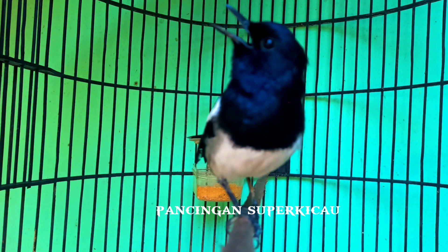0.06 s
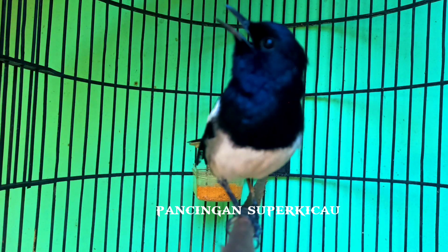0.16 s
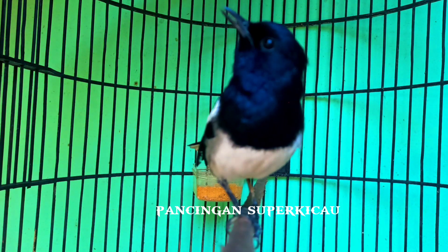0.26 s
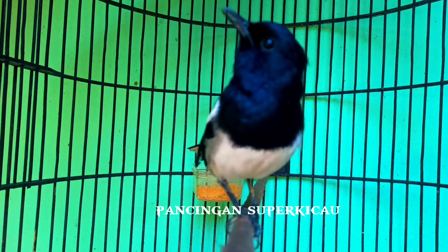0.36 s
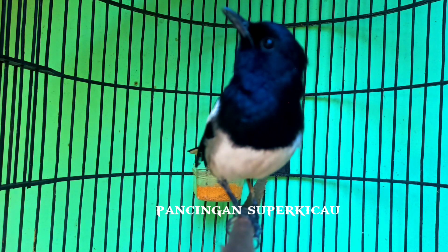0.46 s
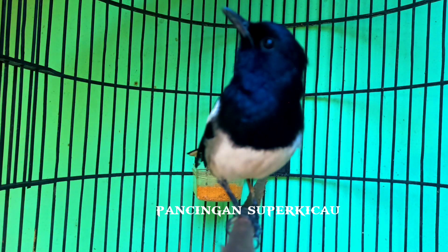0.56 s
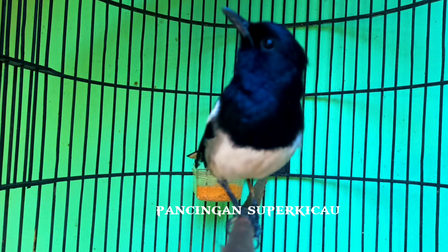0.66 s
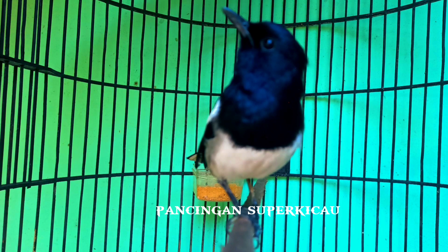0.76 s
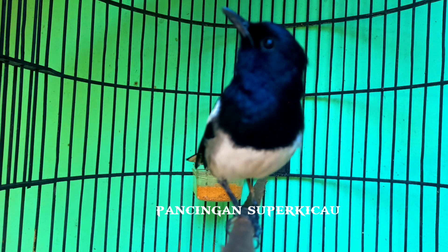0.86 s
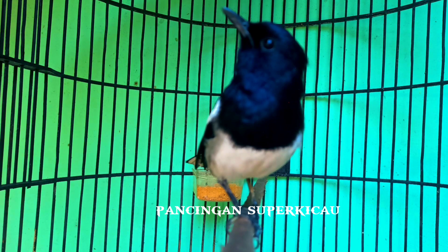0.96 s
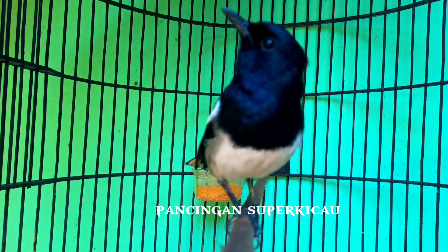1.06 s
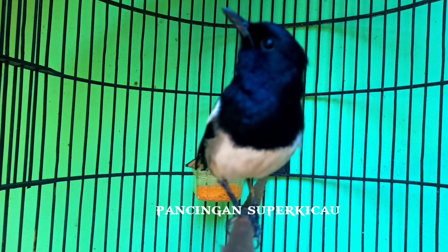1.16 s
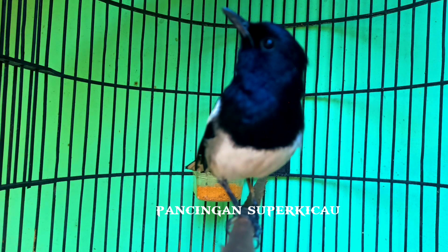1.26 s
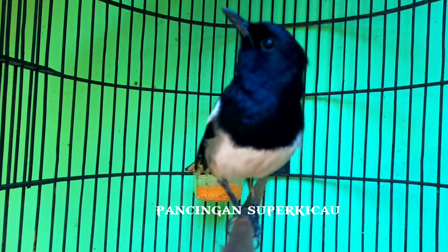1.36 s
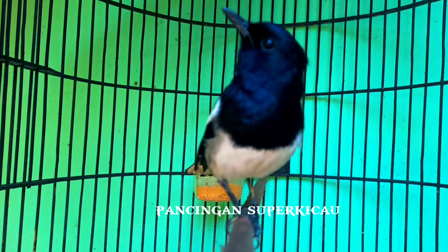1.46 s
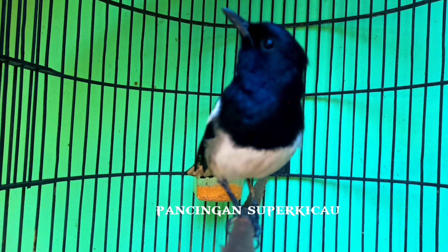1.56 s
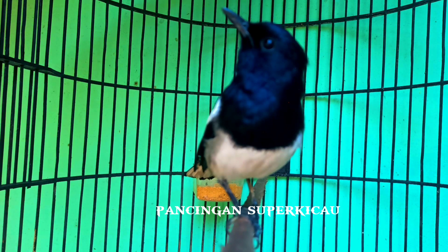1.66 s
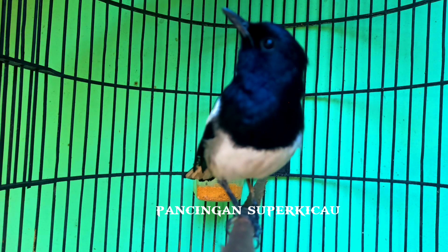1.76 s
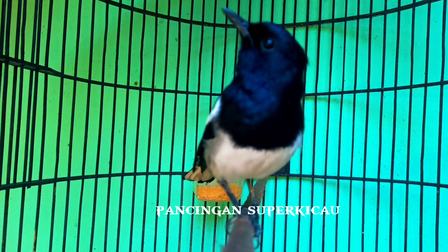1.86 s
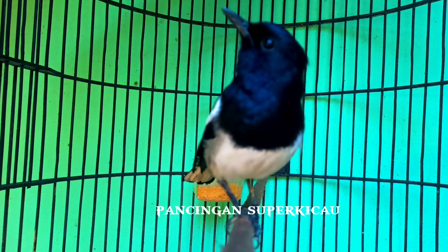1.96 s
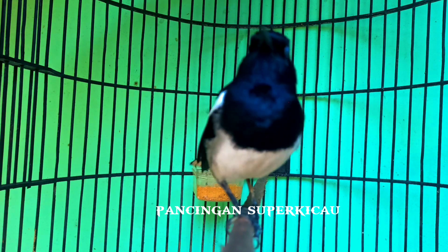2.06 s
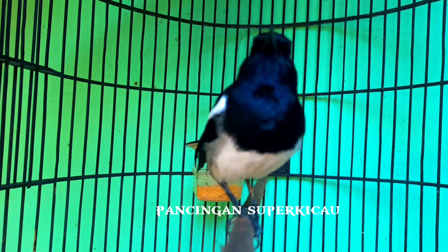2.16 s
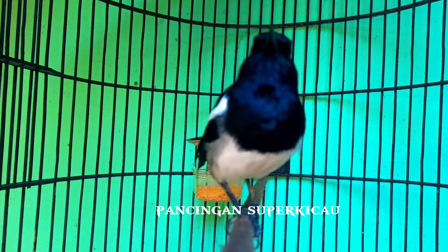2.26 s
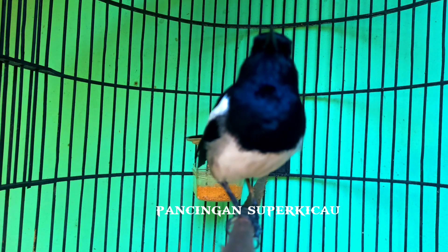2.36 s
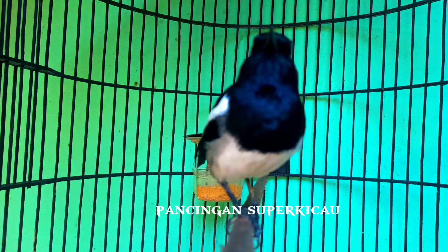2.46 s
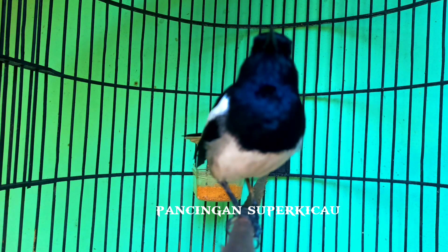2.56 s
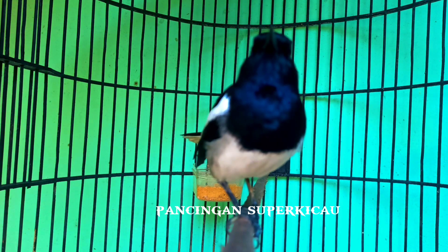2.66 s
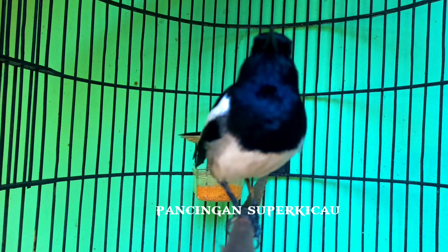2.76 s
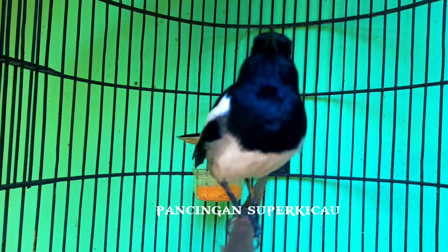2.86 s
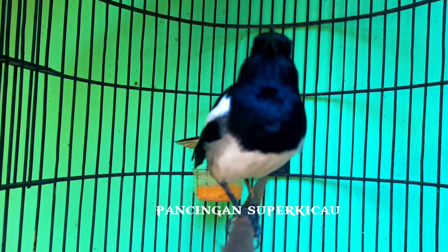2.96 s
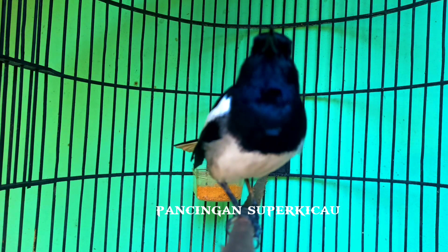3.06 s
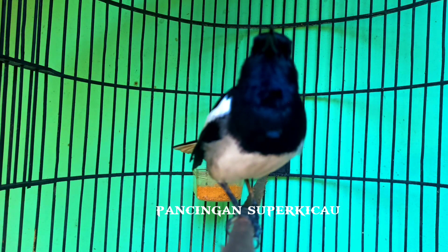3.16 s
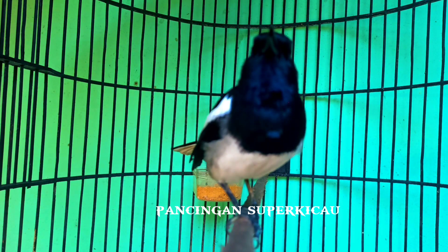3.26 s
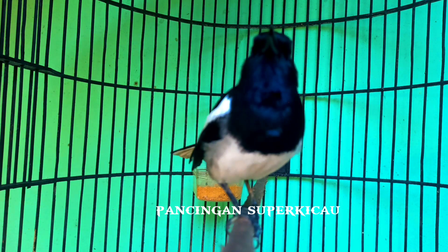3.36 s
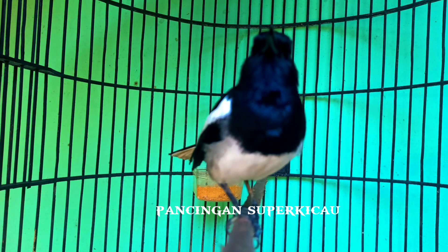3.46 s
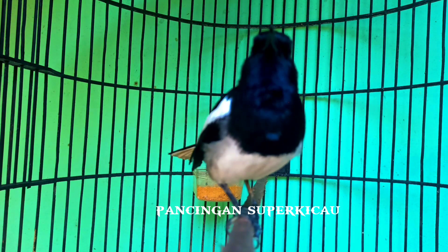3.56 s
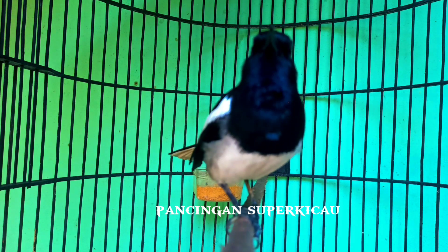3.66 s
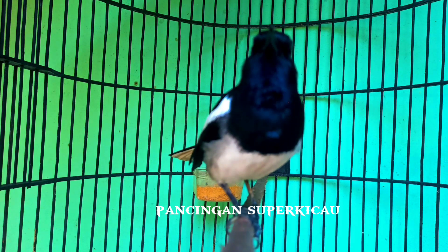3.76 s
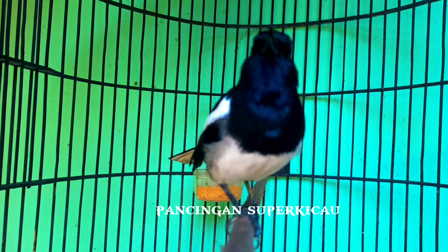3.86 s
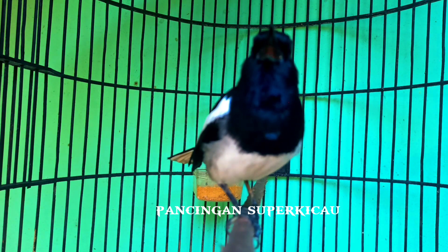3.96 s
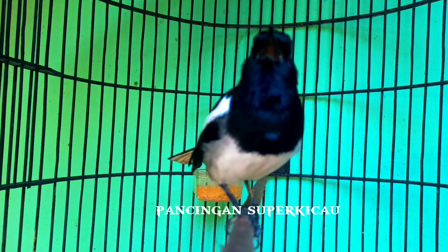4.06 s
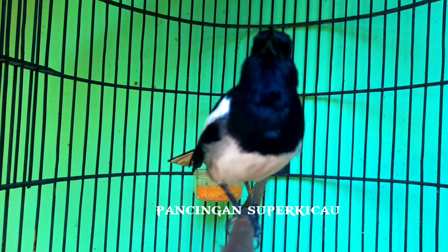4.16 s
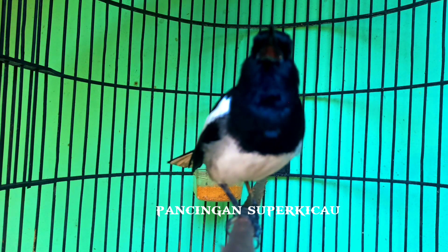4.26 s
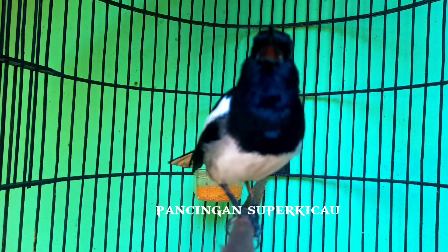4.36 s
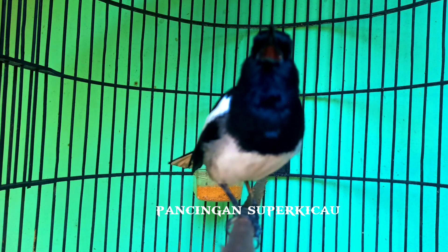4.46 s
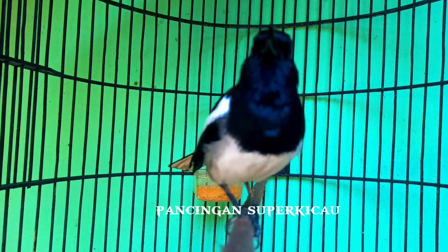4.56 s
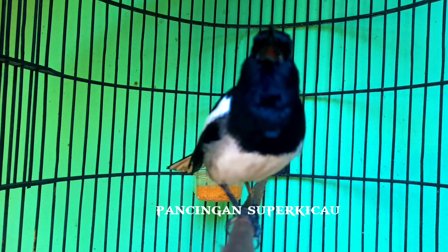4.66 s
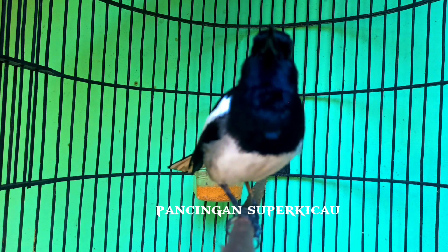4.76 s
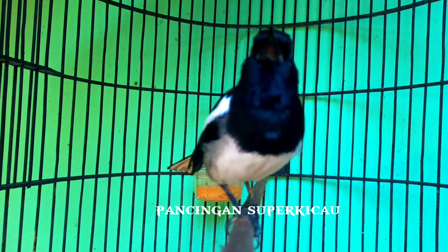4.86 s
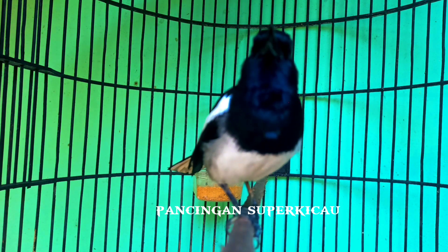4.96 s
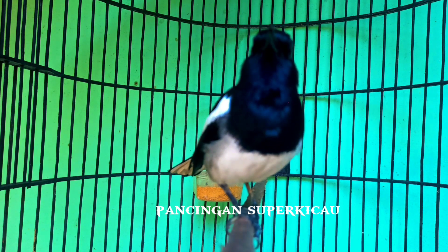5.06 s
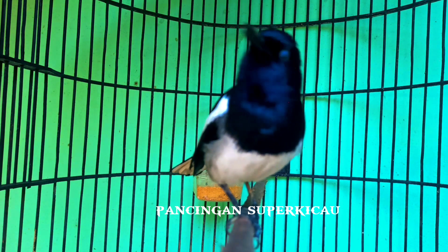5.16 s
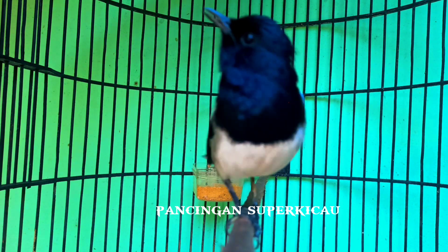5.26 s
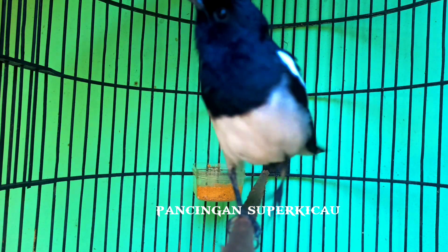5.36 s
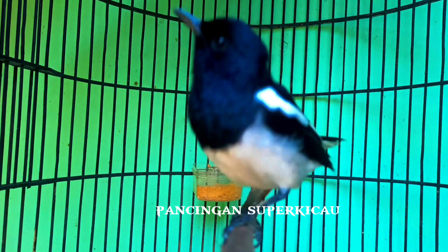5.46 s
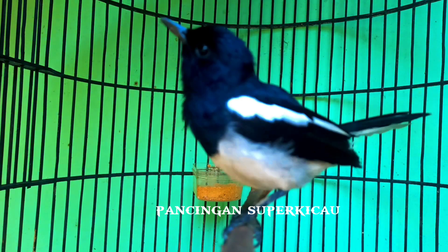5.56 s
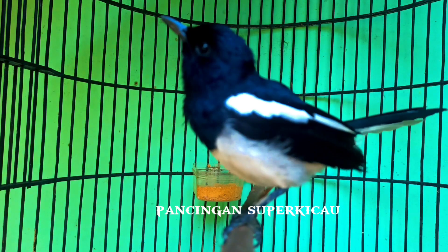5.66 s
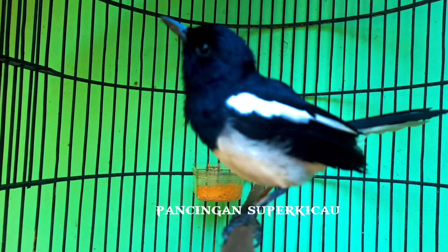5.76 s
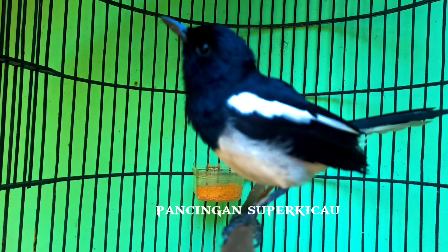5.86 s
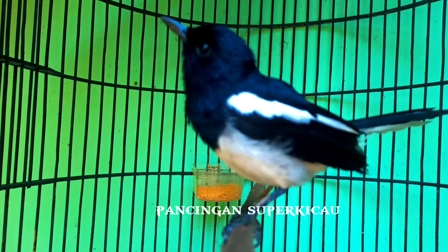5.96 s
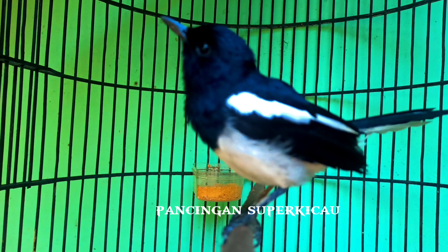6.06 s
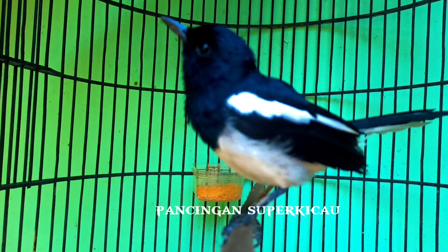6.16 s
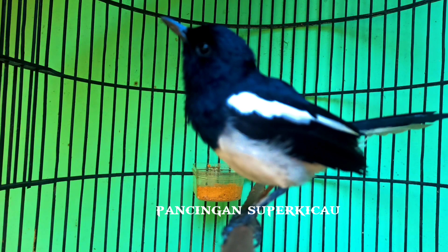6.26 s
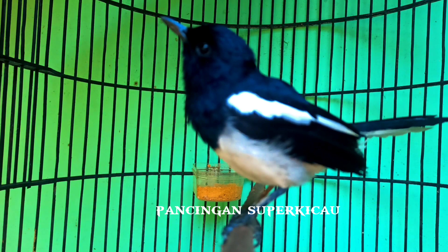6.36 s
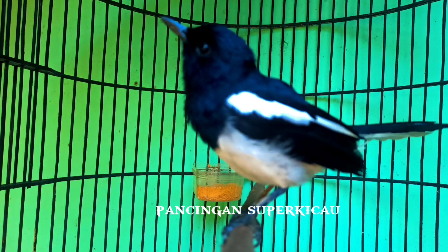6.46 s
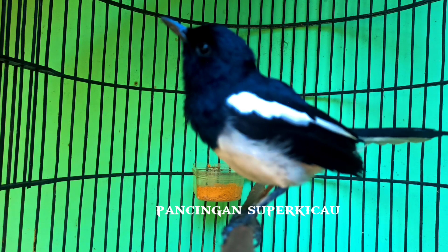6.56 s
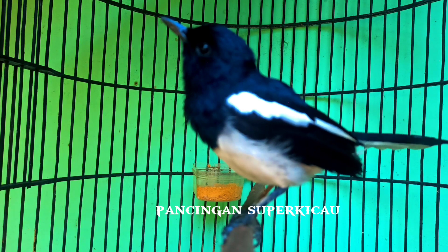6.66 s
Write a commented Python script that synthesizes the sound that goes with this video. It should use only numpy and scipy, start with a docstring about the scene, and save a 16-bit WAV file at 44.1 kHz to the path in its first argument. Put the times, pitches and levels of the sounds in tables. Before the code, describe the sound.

In a slightly echoing room, a nearby caged bird opens with a high whistle and quiet slurred notes, followed by two soft, drawn-out rasps. Loud whistles come next, lower at first and then higher, closing with a fast warble and a brief trill. Thin peeps from a more distant bird and a faint low hum carry on throughout.

```python
"""A caged magpie-robin sings

In a hard-walled room come soft sliding notes, two long hissing rasps, then loud whistles from
both sides of the bird's voice box (the syrinx), ending in a warble and a short trill.
Another bird peeps further off. A faint motor-like hum wavers underneath and dips
whenever a limiter, an automatic volume control, holds down the loud notes."""
import sys
import numpy as np
from scipy import signal
from scipy.fft import rfft, irfft, next_fast_len
from scipy.io import wavfile
from scipy.ndimage import uniform_filter1d

SR = 44100
rng = np.random.default_rng(int(sys.argv[2]) if len(sys.argv) > 2 else 0)


def materialize(psi):
    """Save the field psi as 16-bit PCM at rate SR to the path in sys.argv[1].

    A 1-D psi becomes a single channel; in a 2-D psi each row is a channel.
    """
    bounded = np.clip(np.atleast_2d(psi).T, -1, 1)
    quanta = np.round(bounded * 32767).astype(np.int16)
    wavfile.write(sys.argv[1], SR, quanta)


N = 295911
TIME = np.arange(N) / SR

# whistles: side of the voice box (0 low, 1 high), t/s, length/s, first f/Hz, last f/Hz,
# mid-note bend/Hz, opening scoop/Hz, closing flick/Hz, fade-in/s, level/dB, beak's overtone lift/dB
WHISTLES = [(1, -.012, .236, 4000, 4025, -55, 200, 220, .01, -17.5, 8),
            (0, 3.106, .33, 2535, 2550, 130, -400, -450, .085, -10, 1),
            (1, 3.569, .072, 2960, 2950, -35, 400, -150, .03, -13.5, 2),
            (0, 3.597, .252, 2325, 2225, -115, 190, -150, .085, -11, 1),
            (1, 3.953, .242, 3690, 3470, 28, -200, -300, .055, -5, 8),
            (1, 4.287, .282, 4025, 4050, -42, 1040, 40, .04, -6, 4),
            (0, 4.29, .018, 2450, 2420, 0, 0, 0, .008, -27, 0),
            (1, 4.685, .09, 4060, 4160, -30, 660, -100, .044, -7, 5),
            (0, 5.232, .104, 2370, 2280, 180, -300, -50, .004, -23, -7)]
# the warble's chain of pitch swings: t/s, lowest f/Hz, swing height/Hz, level/dB
WARBLE = [(4.742, 3120, 110, -43), (4.782, 3040, 320, -11), (4.866, 2790, 690, -10), (4.988, 3040, 290, -4),
          (5.017, 2880, 230, -11), (5.04, 2830, 330, -12)]
WARBLE_END_S = 5.064


def gain_of(db):
    """Turns decibels into a number to multiply by."""
    return 10 ** (np.asarray(db) / 20)


def unit_level(x):
    """Scales a signal to an average (rms) size of 1."""
    return x / np.sqrt(np.mean(x ** 2) + 1e-20)


def value_at(points, hz):
    """Reads between rows of f/Hz, value."""
    f, value = np.transpose(points)
    return np.interp(np.log(hz + 1), np.log(f), value)


def noise(colour):
    """Noise of size 1, shaped by rows of f/Hz, level/dB."""
    shape = gain_of(value_at(colour, np.fft.rfftfreq(N, 1 / SR)))
    return unit_level(irfft(rfft(rng.standard_normal(N)) * shape, N))


def wander(rate_hz):
    """A smooth random wobble of size 1, mostly slower than the given rate."""
    size = next_fast_len(N)
    slow = np.exp(-(np.fft.rfftfreq(size, 1 / SR) / rate_hz) ** 2)
    return unit_level(irfft(rfft(rng.standard_normal(size)) * slow, size)[:N])


def envelope(rows):
    """Loudness over time, with rounded ends, from rows that start with t/s and end with level/dB."""
    rows = np.array(rows)
    inside = (TIME >= rows[0, 0]) & (TIME <= rows[-1, 0])
    gain = np.zeros(N)
    gain[inside] = gain_of(np.interp(TIME[inside], rows[:, 0], rows[:, -1]))
    return uniform_filter1d(uniform_filter1d(gain, size=100), size=70)


def breath(start, length, attack, db, release_s=.024):
    """One breath fades in, holds and fades out: rows of t/s, level/dB."""
    t = np.linspace(0, length, num=120)
    rise, fall = np.clip(t / attack, 0, 1), np.clip((length - t) / release_s, 0, 1)
    gain = np.sin(np.pi / 2 * rise) ** 2 * np.sin(np.pi / 2 * fall) ** 2
    return np.column_stack([start + t, db + 20 * np.log10(gain + 1e-4)])


def background(base_hz=49.65, air_db=-53.8):
    """A wavering motor-like hum over the room's low rumble and faint hiss."""
    # the hum's tones: multiple of the base pitch, level/dB
    tones = [(2, -6), (3, -9), (4, -14.5), (5, -14), (6, -20), (7, -17.5), (8, -16), (9, -17.5)]
    # the hum's slow drift: t/s, level/dB
    drift = [(0, -56), (.8, -49.5), (1.7, -53), (2.7, -53), (3.7, -56), (4.4, -55), (5.2, -49),
             (6.7, -53.5)]
    # the colour of the room's air: f/Hz, level/dB
    air = [(15, -57.5), (25, -26), (64, -21), (84, -8.5), (110, -2), (399, -20), (1020, -32.5),
           (2630, -38.5), (3440, -35), (3930, -37.5), (5140, -35.5), (5580, -56), (6550, -26), (9050, -51),
           (15500, -45)]
    phase = 2 * np.pi * np.cumsum(base_hz * (1 + .006 * wander(2.7))) / SR
    hum = sum(gain_of(db + 1.3 * wander(3)) * np.cos(round(k) * phase + .5 * wander(5.3))
              for k, db in tones)
    return gain_of(np.interp(TIME, *np.transpose(drift))) * hum + gain_of(air_db) * noise(air)


def ticks():
    """Tiny clicks as hard notes start and as the bird shifts on its perch."""
    # clicks: t/s, level/dB
    clicks = [(.262, -51), (3.576, -40.5), (3.96, -46.5), (4.297, -43), (4.693, -45.5), (5.492, -53.5),
              (5.522, -57.5), (6.58, -62)]
    scratch = noise([(1000, -4.5), (3000, 1.5), (8000, -.5), (10000, -14.5), (14000, -13)])
    return scratch * sum(envelope([(start, db), (start + .015, db - 22)]) for start, db in clicks)


def peeps(fade_db=19):
    """The other bird's short thin notes; a fast pitch wobble makes some of them buzz."""
    # peeps: t/s, length/s, first f/Hz, last f/Hz, wobble/Hz, peak level/dB
    notes = [(0.071, 0.082, 5300, 5240, 12, -29.5), (1.361, 0.077, 5380, 5290, 100, -33.5),
             (1.973, 0.12, 6550, 6550, 310, -59), (3.244, 0.077, 5310, 5220, 17, -37.5),
             (3.485, 0.067, 5150, 5267, 19, -31.5), (3.505, 0.052, 6400, 6400, 180, -55),
             (3.695, 0.068, 5266, 5144, 17, -35.5), (3.904, 0.071, 5305, 5200, 15.5, -30.5),
             (4.105, 0.1, 5280, 5380, 21, -40), (4.325, 0.058, 5400, 5305, 30, -35),
             (4.614, 0.058, 6300, 6350, 110, -55), (5.255, 0.08, 5110, 5175, 15, -32),
             (6.188, 0.088, 5150, 5320, 15, -30.5)]
    buzz, out = wander(300), np.zeros(N)
    for start, length, first_hz, last_hz, buzz_hz, db in notes:
        hz = np.interp(TIME, [start, start + length], [first_hz, last_hz]) + buzz_hz * buzz
        swell = zip(np.linspace(start, start + length, 4), [db - fade_db, db, db - 1, db - fade_db])
        out += np.sqrt(2) * envelope(list(swell)) * np.cos(2 * np.pi * np.cumsum(hz) / SR)
    return out


def slurs(harshness=.045, fade_db=15):
    """Soft notes that slide along a curve; the faster the slide, the less steady the tone."""
    # slides: t/s, length/s, first f/Hz, middle f/Hz, last f/Hz, peak level/dB, place of the peak (0-1)
    notes = [(.005, .085, 1060, 1410, 1490, -41, .5), (.11, .055, 1545, 1565, 1570, -32, .45),
             (.255, .09, 3350, 2200, 1350, -35, .2), (.421, .055, 1630, 1595, 1570, -34, .25),
             (.505, .095, 1590, 1610, 1690, -34, .6), (.575, .115, 1660, 1870, 2060, -35, .4),
             (.6, .055, 3400, 3600, 3970, -59, .8), (.753, .04, 2330, 2260, 2180, -45, .3),
             (.79, .047, 2180, 2190, 2150, -25, .6), (.859, .052, 2226, 2160, 2125, -25.5, .33),
             (1.012, .11, 880, 1520, 1590, -38.5, .6), (1.1, .11, 1600, 1480, 1390, -38, .6),
             (1.708, .035, 2370, 2750, 2950, -58, .15), (3.32, .055, 3630, 4150, 4770, -50, .7),
             (4.195, .115, 3380, 3610, 3730, -33, .7), (4.585, .048, 4080, 4270, 4600, -35, .6),
             (5.65, .11, 3450, 4000, 5120, -53, .75), (5.745, .07, 5100, 5130, 5130, -49, .4)]
    wobble, out = wander(470), np.zeros(N)
    from_peak = np.linspace(-1, 1, num=21)
    for start, length, first_hz, middle_hz, last_hz, db, peak in notes:
        progress = np.clip((TIME - start) / length, 0, 1)
        curve_hz = (2 * middle_hz - first_hz - last_hz) * 2 * progress * (1 - progress)
        hz = first_hz + (last_hz - first_hz) * progress + curve_hz
        speed = np.minimum(np.abs(np.gradient(hz)) * SR / 20000, 1)
        phase = 2 * np.pi * np.cumsum(hz * (1 + (.0018 + harshness * speed) * wobble)) / SR
        times = start + length * np.interp(from_peak, [-1, 0, 1], [0, np.clip(peak, 0, 1), 1])
        swell = np.column_stack([times, db - fade_db * from_peak ** 2])
        out += np.sqrt(2) * envelope(swell) * np.cos(phase)
    return out


def rasp(breaths, colour, rattle_db=2.5, bounce_s=.0036, bounce_gain=.2):
    """Air forced through a tight throat: a rattling hiss, plus its quick bounce off a near wall."""
    hiss = noise(colour) * gain_of(rattle_db * wander(130))
    bounce = bounce_gain * np.roll(hiss, round(bounce_s * SR))
    return sum(envelope(breath(*row)) for row in breaths) * unit_level(hiss + bounce)


def rasps():
    """Two hissing rasps, the second slightly lower and louder."""
    # breaths: t/s, length/s, fade-in/s, level/dB
    first_rasp = [(.635, .75, .04, -49)]
    second_rasp = [(1.98, .33, .12, -68), (2.368, .745, .055, -46.8)]
    # their colours: f/Hz, level/dB
    first_colour = [(1500, -33), (2400, -21.5), (3100, -14), (3800, -6.5), (4200, -6), (4600, 4),
                    (5000, -21), (5900, -22), (6300, -12.5), (7200, -16), (7650, -7.5), (8450, -19),
                    (8800, -30.5), (10500, -56)]
    second_colour = [(1700, -41.5), (2400, -23), (3300, -20.5), (3800, -8), (4050, -14), (4320, 0.5),
                     (4720, -11), (5050, -30), (5900, -33), (6400, -23), (7300, -19), (7580, -13.5),
                     (8400, -25.5), (9000, -55)]
    return rasp(first_rasp, first_colour) + rasp(second_rasp, second_colour)


def whistle_note(start, length, first_hz, last_hz, bend_hz, scoop_hz, flick_hz, attack, db):
    """A whistle scoops into a curved slide and flicks as it stops: rows of t/s, f/Hz, level/dB."""
    scoop_s, flick_s = .032, .007
    times, level = breath(start, length, attack, db).T
    t = times - start
    slide = first_hz + (last_hz - first_hz) * t / length + bend_hz * np.sin(np.pi * t / length) ** 2
    hz = slide + scoop_hz * np.exp(-t / scoop_s) + flick_hz * np.exp((t - length) / flick_s)
    return np.column_stack([times, hz, level])


def whistle_notes(side):
    """The whistles sung by one side of the voice box."""
    return [whistle_note(*row[1:-1]) for row in WHISTLES if round(row[0]) == side]


def warble_note(end_hz=2680, end_db=-20):
    """The pitch arches from each low point to the next without a break: rows of t/s, f/Hz, level/dB."""
    starts, low_hz, height_hz, db = np.transpose(WARBLE + [(WARBLE_END_S, end_hz, 0, end_db)])
    times = np.linspace(starts[0], starts[-1], num=300)
    swing = np.interp(times, starts, np.arange(len(starts)))
    hz = np.interp(times, starts, low_hz) + height_hz[swing.astype(int)] * np.sin(np.pi * (swing % 1))
    return np.column_stack([times, hz, np.interp(times, starts, db)])


def syrinx(notes, bend_hz=0, pitch_wobble=.0036, shimmer_db=.9):
    """One vibrating side of the voice box: its slightly unsteady pitch, phase and strength."""
    # moments when a held note sinks briefly: t/s, half width/s, level change/dB
    dips = [(.011, .007, -7), (.057, .011, -8), (.11, .035, -6), (3.133, .022, -8), (3.2, .04, -5),
            (3.35, .012, -9), (3.4, .035, -5), (3.835, .02, -3), (4.317, .008, -12), (4.815, .018, -7)]
    times, pitch, _ = np.concatenate(sorted(notes, key=lambda note: note[0, 0])).T
    hz = uniform_filter1d(np.interp(TIME, times, pitch), size=200) + bend_hz
    phase = 2 * np.pi * np.cumsum(hz * (1 + pitch_wobble * wander(210))) / SR
    dip_db = sum(db * np.exp(-((TIME - centre) / width) ** 2) for centre, width, db in dips)
    strength = np.sqrt(2) * sum(envelope(note) for note in notes)
    return hz, phase, strength * gain_of(dip_db + shimmer_db * wander(60))


def beak_lift_db(warble_db=2):
    """The beak moves from one note's opening to the next; wider means stronger overtones."""
    poses = [(start + length / 2, row[-1]) for _, start, length, *row in WHISTLES]
    poses.append(((WARBLE[0][0] + WARBLE_END_S) / 2, warble_db))
    return np.interp(TIME, *np.transpose(sorted(poses)))


def whistle(hz, phase, strength, drift_db=6.5):
    """A nearly pure tone. Its weak overtones swell less than it does and come out as the beak opens."""
    # overtone strength, by the frequency it lands on: f/Hz, level/dB
    colour = [(4300, -37), (5200, -33), (5800, -42), (6500, -37), (7400, -33), (8150, -33), (8800, -54.5),
              (9700, -52.5), (10900, -65.5), (12000, -40.5), (13200, -52), (14400, -42), (15300, -34.5)]
    overtones = sum(gain_of(value_at(colour, k * hz) + drift_db * wander(25))
                    * (k * hz < SR / 2) * np.cos(k * phase) for k in range(2, 8))
    weight = strength * np.sqrt(.3 / (np.abs(strength) + .015)) * gain_of(beak_lift_db())
    return strength * np.cos(phase) + weight * overtones


def song(trill_start_s=5.251, trill_hz=103, trill_depth_hz=160, trill_depth_db=1.8, pull=2.6):
    """The loud whistles. When both sides sing at once, the low pulls on the high and sounds harsh."""
    trill = np.sin(2 * np.pi * trill_hz * (TIME - trill_start_s)) * (TIME > trill_start_s)
    low_hz, low_phase, low = syrinx(whistle_notes(side=0) + [warble_note()], trill_depth_hz * trill)
    high_hz, high_phase, high = syrinx(whistle_notes(side=1))
    low = low * gain_of(trill_depth_db * trill)
    high_phase = high_phase + pull * low * np.sin(high_phase - low_phase)
    # the two tones mix into their sum and difference, and the air between them turns rough
    mixed = gain_of(-2) * np.cos(high_phase + low_phase) + gain_of(-20) * np.cos(high_phase - low_phase)
    rush = noise([(500, -7.5), (3500, -2.5), (8000, -4.5), (10500, -22.5), (12500, -11), (15000, -14)])
    clash = low * high * (mixed + gain_of(-20) * rush)
    breathiness = gain_of(-60) * (low + high) * rush
    return whistle(low_hz, low_phase, low) + whistle(high_hz, high_phase, high) + clash + breathiness


def room(x, echoes_per_s=3000, first_echo_s=.004):
    """Crowded echoes off near walls, each frequency dying away at its own speed."""
    # how long the room rings: f/Hz, time/s to fade by 60 dB
    ring_times = [(500, 0.46), (1500, 0.57), (3000, 0.49), (5300, 0.56), (8000, 0.64), (14000, 0.083)]
    echoes = rng.choice([-1., 1.], SR) * (rng.random(SR) < echoes_per_s / SR)
    echoes *= np.arange(SR) > first_echo_s * SR
    hz, t, bands = signal.stft(echoes, SR, nperseg=256)
    early_boost = 1 + 1.2 * np.exp(-t / .021)
    fade = gain_of(-60 * t / value_at(ring_times, hz)[:, None])
    tail = signal.istft(bands * early_boost * fade, SR, nperseg=256)[1]
    return signal.fftconvolve(x, tail / np.linalg.norm(tail))[:N]


def limiter(x, threshold_db=-18.6, ratio=5, recover_db_per_s=330, treble_bias=.7):
    """Turns everything down during loud notes, reacting most to high ones; hum and echoes dip too."""
    sensed = signal.lfilter([1, -treble_bias], [1], x)
    power_db = 10 * np.log10(np.abs(uniform_filter1d(sensed ** 2, size=200)) + 1e-12)
    recovery = TIME * recover_db_per_s
    held_db = np.maximum.accumulate(power_db + recovery) - recovery  # jumps up, sinks back steadily
    over_db = np.maximum(held_db - threshold_db, 0)
    return x * gain_of(-(1 - 1 / ratio) * uniform_filter1d(over_db, size=200))


def scene():
    """The loud song is close and clear; the soft sounds carry more of the room's echo."""
    loud, soft, other_bird = song(), slurs(), peeps()
    noises = rasps() + ticks()
    direct = loud + gain_of(-3) * soft + gain_of(-2.5) * other_bird + gain_of(.8) * noises
    echo = room(gain_of(-24) * loud + gain_of(-4) * soft
                + gain_of(-12.5) * other_bird + gain_of(-2.5) * noises)
    return (direct + echo + background())[None]


def record(dry, top_hz=15650):
    """Holds down the loud notes, weakens three narrow bands and cuts off the highest treble."""
    # narrow bands that sound quieter, so notes sliding through them fade: f/Hz, half width/Hz, level/dB
    notches = [(3255, 70, -11), (3600, 70, -2), (3945, 22, -5)]
    hz = np.fft.rfftfreq(2 * N, 1 / SR)
    colour = gain_of(sum(db / (1 + ((hz - centre) / width) ** 2) for centre, width, db in notches))
    heard = irfft(rfft(limiter(dry[0]), 2 * N) * colour)[:N]
    treble_cut = signal.firwin(511, top_hz, window=("kaiser", 9), fs=SR)
    return signal.oaconvolve(heard, treble_cut, "same")[None]


dry = scene()
out = record(dry)
materialize(out)
```